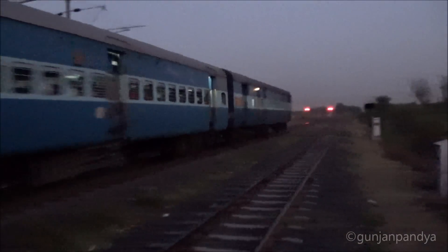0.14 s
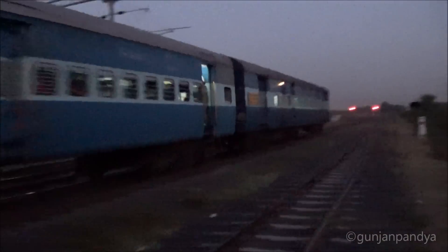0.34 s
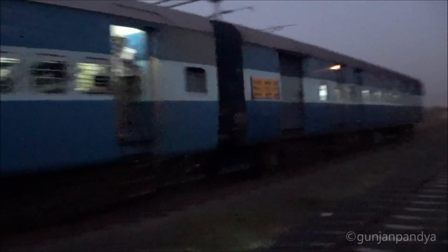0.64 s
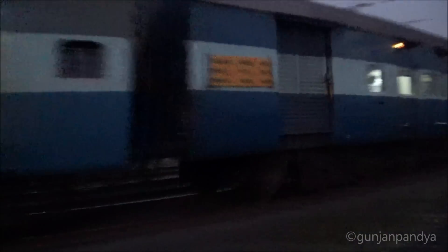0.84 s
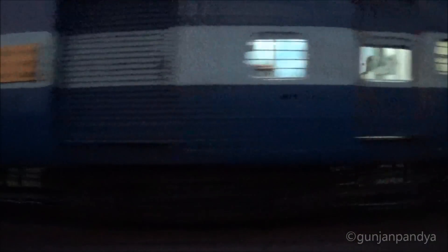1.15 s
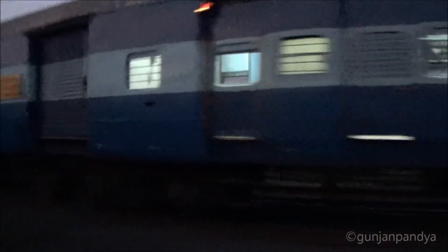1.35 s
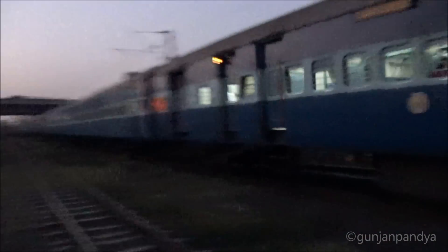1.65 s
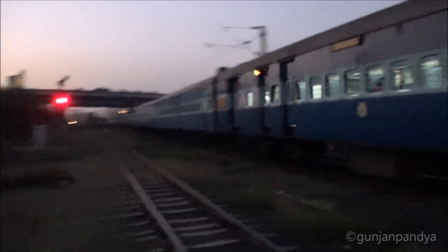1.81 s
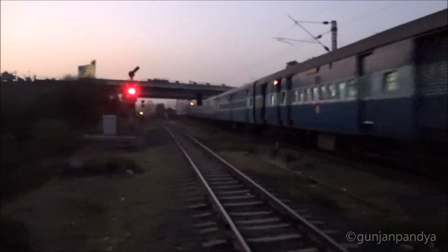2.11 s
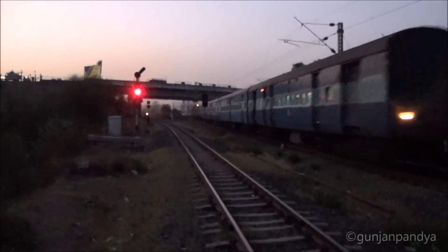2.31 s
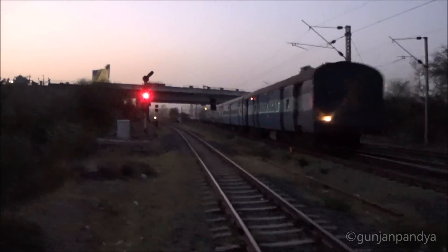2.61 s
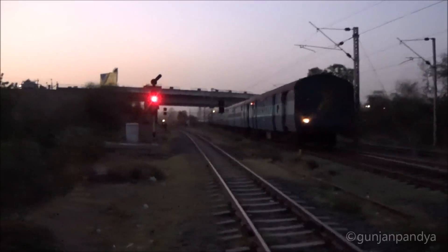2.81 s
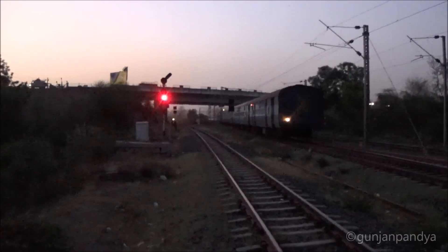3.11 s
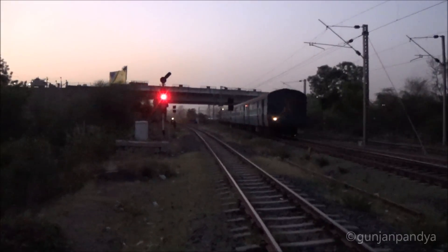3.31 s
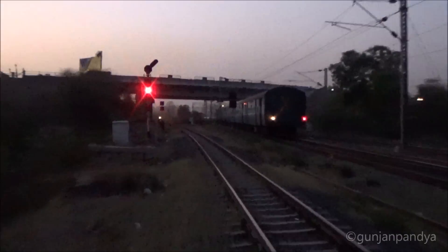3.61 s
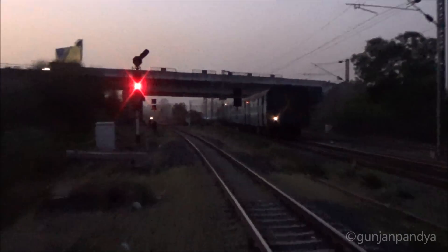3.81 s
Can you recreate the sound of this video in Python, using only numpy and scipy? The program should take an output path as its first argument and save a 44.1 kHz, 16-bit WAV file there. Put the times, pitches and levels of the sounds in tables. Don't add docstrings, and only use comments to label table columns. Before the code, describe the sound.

Close, loud coaches rumble and hiss outdoors, axles clacking with coupling knocks and brief flange squeals; around 2.5 seconds the train clears the camera microphone and its noise turns faint and blurred.

```python
import sys
import numpy as np
from scipy import signal
from scipy.fft import rfft, irfft, next_fast_len
from scipy.io import wavfile
from scipy.ndimage import uniform_filter1d, map_coordinates

SR = 44100
rng = np.random.default_rng(int(sys.argv[2]) if len(sys.argv) > 2 else 0)


def file_out(sig):
    cols = np.atleast_2d(sig).T
    lim = np.clip(cols, -1, 1)
    pcm = np.round(lim * 32767).astype(np.int16)
    wavfile.write(sys.argv[1], SR, pcm)


def boost_factor(decibels):
    exponent = np.asarray(decibels, float) / 20
    return 10 ** exponent


N = 174195
T = np.arange(N) / SR
GONE_S, GONE_OVER_S = 2.49, 0.07

# (time [s], roar level [dB], hiss relative to roar [dB])
ROLLING = [(0, -15.5, -9), (.2, -16, -13.5), (.3, -17, -9), (.9, -14.5, -11), (1.07, -18, -12),
           (1.15, -15.5, -5.5), (1.8, -15.5, -7.5), (1.95, -16.5, -9), (2.03, -22, -2.5), (2.08, -16, -8),
           (2.45, -19.5, -3.5), (2.53, -27, -5.5), (3.01, -27, -5), (3.14, -34, -17), (3.25, -25.5, -5),
           (3.45, -27.5, -9), (3.6, -27, -10), (3.95, -27, -3.5)]
# (frequency [Hz], density [dB per Hz])
ROAR_NEAR = [(15, -48), (40, -18.5), (150, -7.5), (196, -3), (439, -5), (732, -1), (1750, -10), (2510, -14),
             (4000, -21), (5200, -31.5), (8800, -120)]
# (frequency [Hz], density [dB per Hz])
ROAR_AWAY = [(25, -11), (80, -12), (150, -15.5), (330, -9.5), (580, -8), (1100, -9), (4000, -23.5),
             (8000, -51), (12000, -90)]
# (frequency [Hz], width [Hz], lift [dB])
BODY_MODES = [(206, 63, 4), (275, 25, 4), (478, 193, 6)]
# (frequency [Hz], density [dB per Hz])
TREAD_HISS = [(710, -46), (1200, -23), (1500, -16), (2460, -9.5), (5210, -16), (8750, -18), (12000, -31),
              (15000, -43)]
# (time [s], peak level [dB], length factor [1])
AXLE_CRASHES = [(0.0014, -17.5, 0.84), (0.0824, -22, 1.4), (0.239, -13.5, 2.6), (0.365, -15, 0.89),
                (0.473, -14.5, 1), (0.5506, -12.5, 1.1), (0.6666, -12, 1.6), (0.7794, -16.5, 2.7),
                (0.9114, -12.5, 0.34), (1.0024, -18, 0.97), (1.1583, -7, 0.61), (1.2756, -10, 3.6),
                (1.3384, -10.5, 2.1), (1.3986, -9.5, 0.51), (1.467, -6.5, 1.6), (1.576, -5, 1.1),
                (1.596, -10.5, 1.8), (1.6594, -13, 2.9), (1.697, -16.5, 1), (1.729, -11.5, 1.5),
                (1.7825, -7.5, 0.8), (1.974, -21, 0.43), (2.059, -9.5, 1.2), (2.1959, -11, 1.8),
                (2.2775, -12.5, 1.4), (2.4094, -14.5, 1.3), (2.66, -17.5, 1.5), (2.703, -18.5, 1.4),
                (2.752, -17, 1.7), (2.8094, -19, 1.1), (2.9164, -17.5, 2.7), (3.0415, -10, 0.31),
                (3.17, -30, 1), (3.2301, -19.5, 2.6), (3.3494, -12.5, 1.1), (3.55, -25, 1),
                (3.678, -20, 0.43), (3.837, -9.5, 0.37), (3.925, -10.5, 0.88)]
# (frequency [Hz], density [dB per Hz])
CRASH_NEAR = [(880, -11.5), (1500, -11), (2460, -5.5), (2990, -10.5), (3230, -9), (11500, -15.5),
              (13800, -30), (15300, -56)]
# (frequency [Hz], density [dB per Hz])
CRASH_AWAY = [(880, -27), (1500, -6), (2400, -4), (4500, -8), (6500, -11), (10500, -17), (13200, -32),
              (14400, -70)]
# (time [s], peak level [dB], thump relative to clack [dB])
AXLE_CLACKS = [(0.031, -13, 12), (0.249, -11, -4), (0.409, -5, -12), (0.689, -20, 5), (1.019, -22, -29),
               (1.119, -5, -23), (1.209, -12, -25), (1.299, -13, 3), (1.469, -14, -3), (1.729, -5.5, -3.5),
               (1.879, -6, -18), (1.935, -3, -5), (2.068, 2.5, -26), (2.197, -2.5, -6), (2.262, -5.5, 1),
               (2.31, -6, 1), (2.446, -4, -8), (2.572, -15, 4), (2.67, -14, 4), (2.708, -9, 0),
               (2.821, -2.5, -8.5), (2.945, -7, -11), (3.05, -8.5, -3.5), (3.089, -17, 2),
               (3.173, -9.5, -16), (3.241, -9, -15), (3.366, -8, -19), (3.433, -11.5, -11),
               (3.553, -13.5, -2), (3.67, -8.5, -16), (3.769, -15.5, -1), (3.831, -9.5, -8),
               (3.927, -5.5, -13)]
# (frequency [Hz], width [Hz], level [dB])
WHEEL_MODES = [(571, 96, 1), (979, 73, -2), (1810, 114, -5.5), (2367, 73, -7), (2930, 170, -17.5),
               (3356, 74, -14.5), (3663, 61, -17.5)]
# (time [s], peak level [dB])
COUPLING_KNOCKS = [(.993, -2.5), (1.021, -11.5), (1.107, -5.5), (1.453, -11), (1.743, -8), (1.975, -7),
                   (2.205, -5), (2.273, -4), (2.392, -5.5), (2.446, -8.5), (2.703, -11.5), (2.826, -12.5),
                   (2.949, -13.5), (3.092, -23), (3.193, -17), (3.366, -16), (3.555, -17)]
# (time [s], peak level [dB], length factor [1])
FRAME_BOOMS = [(.03, -17, 1.2), (.1, -21, 1), (.31, -25, 0.84), (.5, -27, 0.83), (.8, -24, 1.1),
               (1.01, -24, 0.93), (1.38, -27, 1), (1.73, -20, 1), (2.12, -25, 1), (2.21, -21, 1.1),
               (2.31, -19, 0.87), (2.56, -25.5, 0.87), (2.68, -26.5, 1), (2.79, -26, 1.25),
               (2.95, -30, 0.58), (3.13, -33, 1)]
# (frequency [Hz], density [dB per Hz])
BOOM_COLOUR = [(30, -22), (60, -16.5), (100, 2), (180, -5.5), (280, -3.5), (450, -44)]
# (time [s], frequency [Hz], level [dB], length [s])
FLANGE_SQUEALS = [(1.284, 3270, -20, .04), (1.485, 2520, -23, .07), (1.5, 1460, -18, .04),
                  (1.505, 8750, -28, .03), (1.559, 11400, -31, .016), (1.695, 8900, -22, .018),
                  (1.715, 8750, -24, .022), (1.735, 7100, -27, .014), (1.77, 7650, -27, .022),
                  (1.78, 2720, -26, .05), (1.805, 8750, -29, .03), (1.865, 1700, -23, .06),
                  (1.98, 3900, -29, .04), (2.07, 2440, -24, .09), (2.2, 1640, -23, .06),
                  (2.33, 1950, -22, .07), (2.814, 1810, -21, .024), (2.84, 1760, -28, .05),
                  (2.955, 2340, -24, .03), (3.085, 970, -24, .025)]
# (time [s], frequency [Hz], level [dB], t60 [s], width [Hz])
LOOSE_PARTS = [(2.45, 3880, -31, .8, 60), (1.572, 8770, -21, .12, 200), (1.662, 7600, -16, .08, 60),
               (2.4, 2960, -23, .4, 60), (1.72, 11650, -28, .45, 350), (2.14, 2380, -25, .6, 90),
               (3.046, 7200, -33, .2, 30), (3.302, 7200, -21, .1, 20), (3.304, 8420, -19, .07, 20),
               (3.39, 6019, -42, 1.4, 15), (3.39, 8161, -42, 1.2, 15), (1.84, 286, -15, .7, 25),
               (3.22, 575, -27, .8, 30)]
# (time [s], level [dB])
WIND = [
    (0, -39),
    (1.25, -37.5),
    (1.4, -48),
    (3.95, -51),
]
# (frequency [Hz], density [dB per Hz])
WIND_COLOUR = [(20, -20), (40, 4), (75, -3), (130, -33)]
# (time [s], aim, left positive [1], stereo width [1])
CAMERA_PAN = [(0, 0.6, 1.22), (.9, 0.56, 1.2), (1.25, 0.25, 1.08), (1.75, -0.27, 0.86), (2.3, -0.37, 1.04),
              (2.7, -0.099, 0.68), (3.2, -0.13, 0.58), (3.95, -0.016, 0.6)]
# (frequency [Hz], side gain per unit aim [1])
AIM_GAIN = [(100, 0.076), (400, 0.5), (1500, 0.83), (4000, 0.72), (7000, 0.17), (12000, .02)]
# (frequency [Hz], side gain [1])
TILT_GAIN = [(100, -.15), (1000, -.03)]
# (frequency [Hz], quarter-turn side gain [1])
LAG_GAIN = [(100, 0.19), (600, 0.58), (2500, 0.26), (5500, 0.29), (10000, 0.025)]
# (frequency [Hz], unrelated side gain [1])
DIFFUSE_GAIN = [(100, 0.15), (500, 0.16), (1500, 0.27), (5500, 0.28), (9000, 0.28), (12000, 0.067)]


def unit(x):
    return x / np.sqrt(np.mean(x ** 2) + 1e-20)


def along(points, hz):
    f, v = np.transpose(points)
    return np.interp(np.log(hz + 1), np.log(f + 1), v)


def colour(points):
    return lambda hz: boost_factor(along(points, hz))


def curves(rows):
    s, *columns = np.transpose(rows)
    return [np.interp(T, s, column) for column in columns]


def wobble(rate):
    knots = rng.standard_normal(int(N * rate / SR) + 4)
    return map_coordinates(knots, [T * rate])


def filtered(x, response):
    m = next_fast_len(N + SR // 2)
    return irfft(rfft(x, m) * response(np.fft.rfftfreq(m, 1 / SR)), m)[..., :N]


def rush(response, patchy_db):
    z = signal.stft(rng.standard_normal((2, N)), nperseg=512)[2]
    field = rng.standard_normal(z.shape[1:])
    field = uniform_filter1d(uniform_filter1d(field, 6, 0), 8, 1)
    noise = signal.istft(z * boost_factor(patchy_db * unit(field)), nperseg=512)[1][:, :N]
    return unit(filtered(noise, response))


def gone():
    return 0.5 + 0.5 * np.tanh((T - GONE_S) / GONE_OVER_S)


def receding(near, far, patchy_db):
    near_noise = np.sqrt(1 - gone()) * rush(near, patchy_db)
    return near_noise + np.sqrt(gone()) * rush(far, patchy_db)


def bursts(rows, rise_s, t60_s, far_blur_s=0):
    power = np.zeros(N)
    for s, db, longer in rows:
        i = max(round(s * SR), 0)
        t = np.maximum(T[i:i + SR] - s, 0)
        rise = 1 - np.exp(-t / (rise_s + far_blur_s * (s > GONE_S)))
        fall = boost_factor(db - 60 * t / (t60_s * np.clip(longer, 0.2, 5)))
        power[i:i + SR] += (fall * rise) ** 2
    return np.sqrt(power)


def rolling():
    db, hiss_db = curves(ROLLING)
    hiss = receding(colour(TREAD_HISS), colour(CRASH_AWAY), patchy_db=0.94)
    hiss = boost_factor(hiss_db + wobble(11)) * gaps() * hiss
    return boost_factor(db + 0.89 * wobble(20)) * (roar(patchy_db=2.0) + hiss)


def roar(patchy_db):
    def near(f):
        lift_db = sum(db / (1 + (2 * (f - centre) / width) ** 2) for centre, width, db in BODY_MODES)
        return boost_factor(along(ROAR_NEAR, f) + lift_db)

    return receding(near, colour(ROAR_AWAY), patchy_db)


def crashes():
    noise = receding(colour(CRASH_NEAR), colour(CRASH_AWAY), patchy_db=2.43)
    envelope = bursts(AXLE_CRASHES, rise_s=0.0004, t60_s=0.52, far_blur_s=0.011)
    return boost_factor(-9 + 0.5 * wobble(250)) * envelope * gaps() * noise


def gaps():
    s, db, _ = np.transpose(AXLE_CRASHES)
    k = np.minimum(np.searchsorted(s, T), len(s) - 1)
    strength = boost_factor(db - db.max())[k]
    return boost_factor(-11 * strength * (s[k] > T) * np.exp(-np.abs(s[k] - T) / 0.009))


def wheel_modes(doppler):
    def response(f):
        total = 0
        for k, (hz, width, db) in enumerate(WHEEL_MODES):
            damping = 1j * f * width
            total = total + (-1) ** k * boost_factor(db) * damping / ((hz * doppler) ** 2 - f * f + damping)
        return total / (1 + (f / 7000) ** 4)

    return response


def wheels():
    ring_db = -10.5 + 6.5 * gone()
    steady = boost_factor(curves(ROLLING)[0] + ring_db + 2.13 * wobble(21.99))
    lead_s, clack_db = 0.017, -8.5
    clack_rows = [(s - lead_s, db + clack_db, 1) for s, db, _ in AXLE_CLACKS]
    thump_rows = [(s - lead_s, db + low + clack_db, 1) for s, db, low in AXLE_CLACKS]
    clack = bursts(clack_rows, rise_s=0.014, t60_s=0.23)
    thump = bursts(thump_rows, rise_s=0.014, t60_s=0.23)
    ringing = receding(wheel_modes(1.035), wheel_modes(0.99), patchy_db=2.0)
    return np.hypot(steady, clack) * ringing + thump * roar(patchy_db=3.0)


def knocks():
    rows = [(s, db, 1) for s, db in COUPLING_KNOCKS]
    return boost_factor(-6.5) * bursts(rows, rise_s=0.00085, t60_s=0.11) * roar(patchy_db=2)


def booms():
    return bursts(FRAME_BOOMS, rise_s=0.012, t60_s=0.36) * rush(colour(BOOM_COLOUR), patchy_db=0.5)


def squeals():
    out = np.zeros(N)
    sag_per_s = 0.48
    for s, hz, db, length in FLANGE_SQUEALS:
        t = np.clip(T - s, 0, length)
        phase = 2 * np.pi * hz * (t - sag_per_s * t ** 2 / 2) + 0.9 * wobble(90)
        swell = np.sqrt(np.abs(np.sin(np.pi * t / length)))
        out += boost_factor(db + 4.7 * wobble(110)) * swell * np.sin(phase)
    return out * np.array([[1], [0.4]])


def pings():
    out = np.zeros(N)
    for s, hz, db, t60, width in LOOSE_PARTS:
        t = np.maximum(T - s, 0)
        share = min(width / 150, 1)
        rattle = wobble(width) + 1j * wobble(width)
        carrier = np.sqrt(1 - share) + np.sqrt(share / 2) * rattle
        envelope = boost_factor(db - 60 * t / t60) * (1 - np.exp(-t / 0.00036))
        out += envelope * (carrier * np.exp(2j * np.pi * hz * t)).imag
    return out * np.array([[1], [0.4]])


def draught():
    level_db = curves(WIND)[0] + 3.7 * wobble(7.5)
    return boost_factor(level_db) * rush(colour(WIND_COLOUR), patchy_db=1.0)


def scene():
    mid, scattered = rolling() + crashes() + wheels() + knocks() + booms() + squeals() + pings() + draught()
    aim, width = curves(CAMERA_PAN)
    aim = aim + 0.21 * wobble(10)
    aimed = filtered(mid, lambda f: along(AIM_GAIN, f))
    lagging = filtered(mid, lambda f: along(TILT_GAIN, f) - 1j * along(LAG_GAIN, f))
    diffuse = filtered(scattered, lambda f: along(DIFFUSE_GAIN, f))
    side = aim * aimed + width * (lagging + diffuse)
    return np.array([mid + side, mid - side])


def top_cut(x):
    return signal.sosfilt(signal.butter(12, 15480, fs=SR, output="sos"), x)


def record(dry):
    x = filtered(dry, lambda hz: (hz < 15500) * hz ** 4 / (hz ** 4 + 35 ** 4))
    ceiling, knee = 1.15, 5
    mix = x / (1 + np.abs(x / ceiling) ** knee) ** (1 / knee)
    return top_cut(mix)


dry = scene()
out = record(dry)
file_out(out)
```